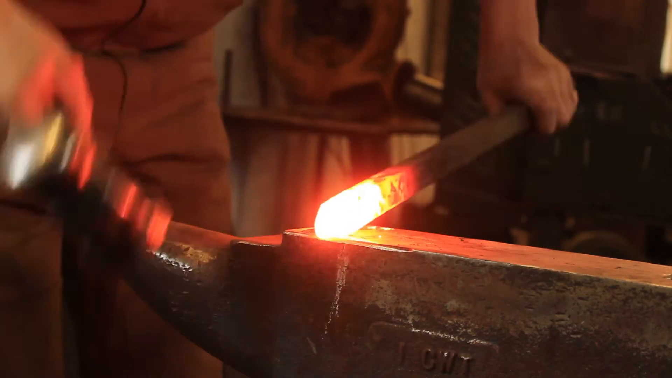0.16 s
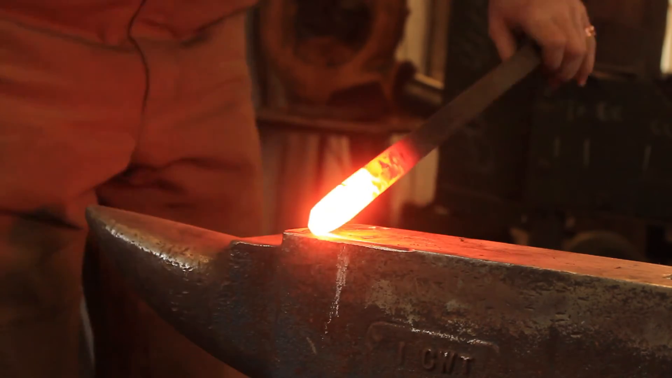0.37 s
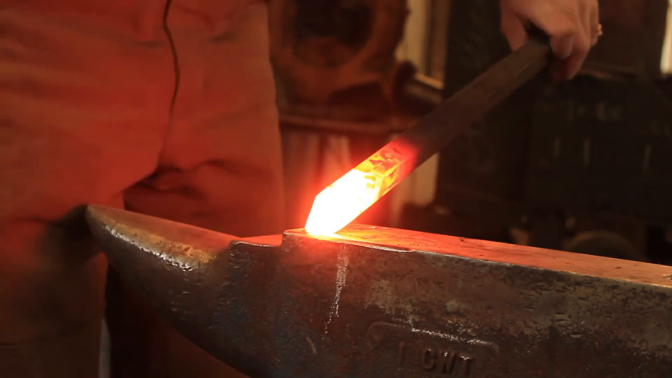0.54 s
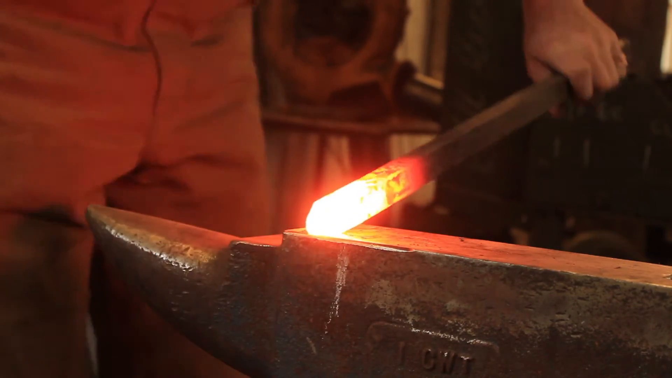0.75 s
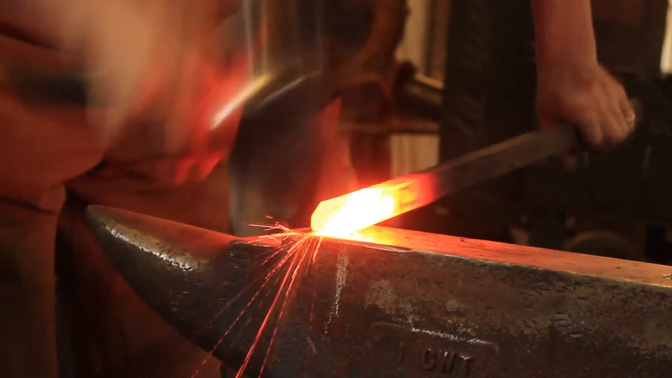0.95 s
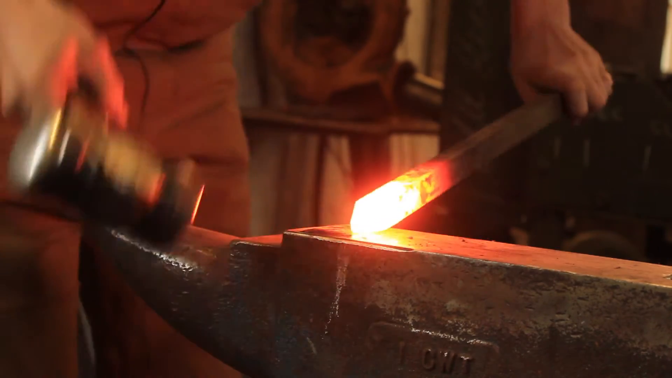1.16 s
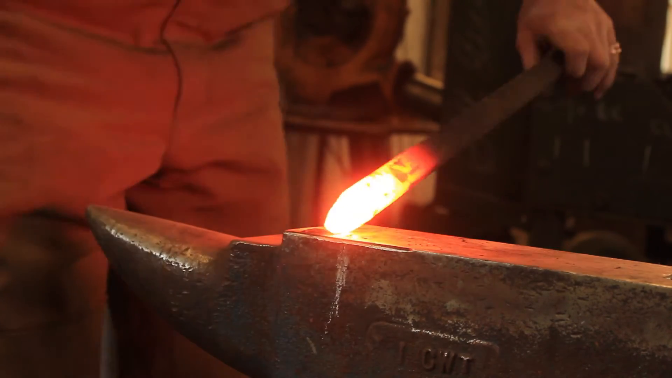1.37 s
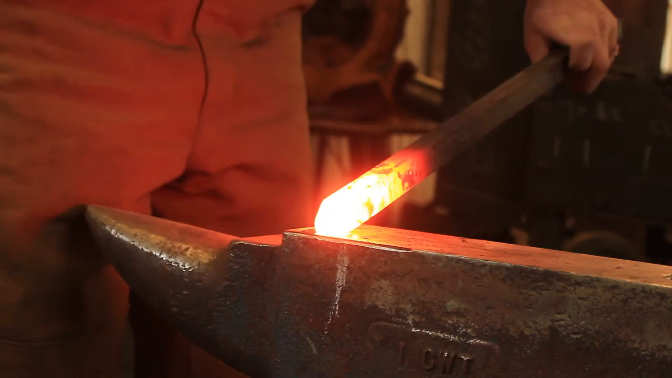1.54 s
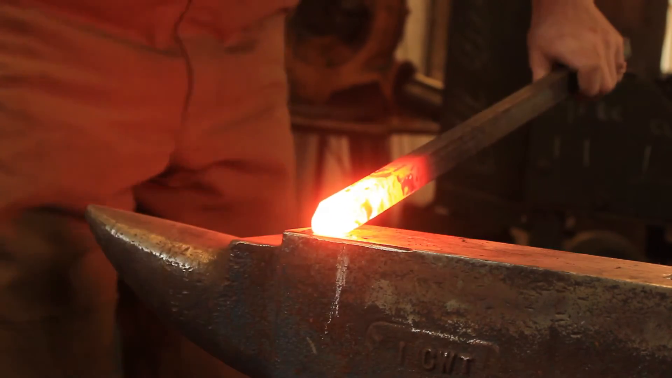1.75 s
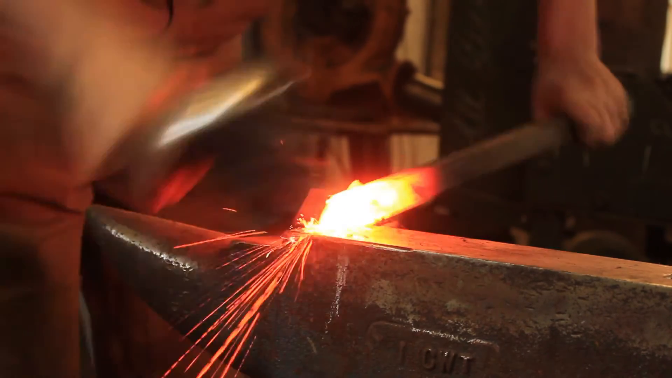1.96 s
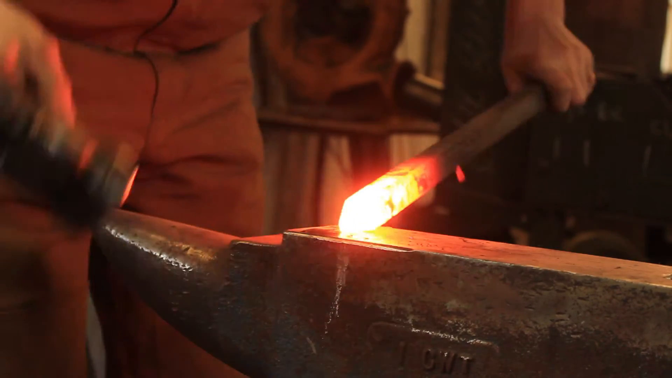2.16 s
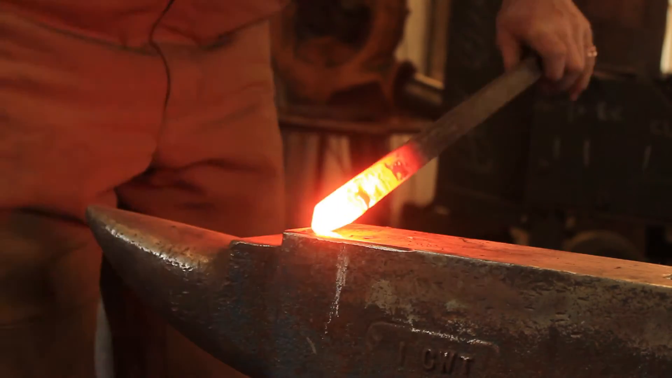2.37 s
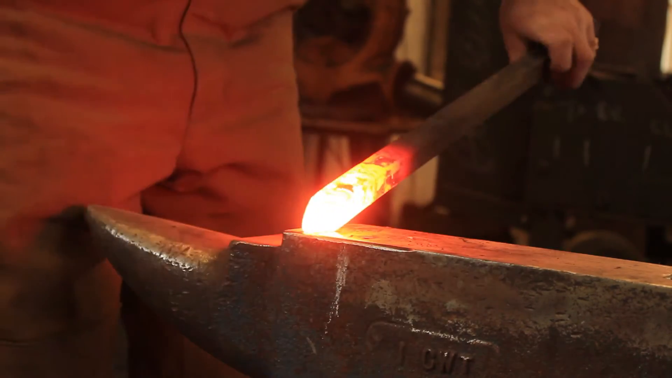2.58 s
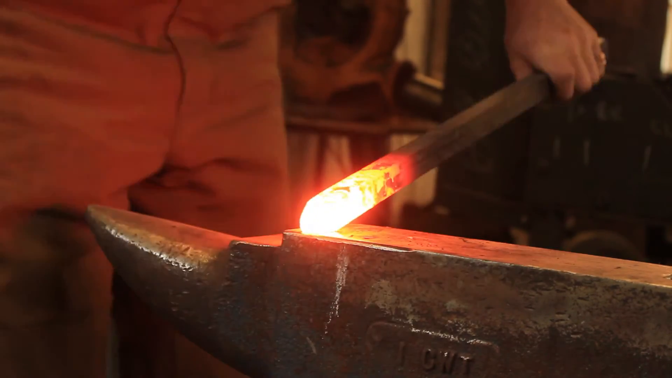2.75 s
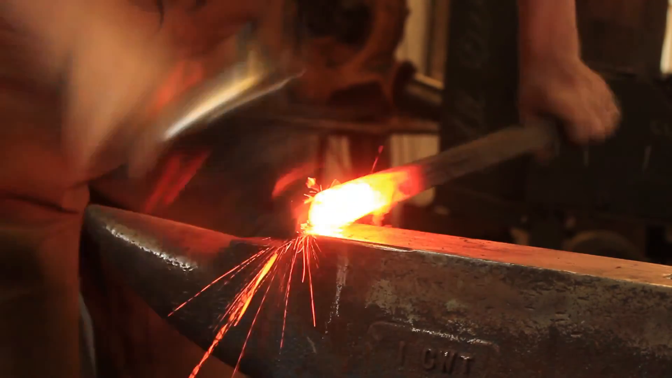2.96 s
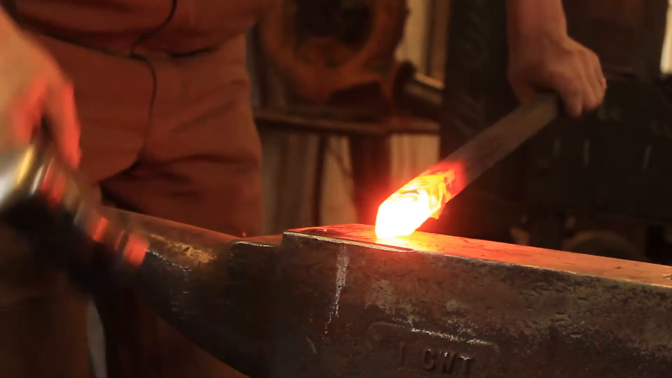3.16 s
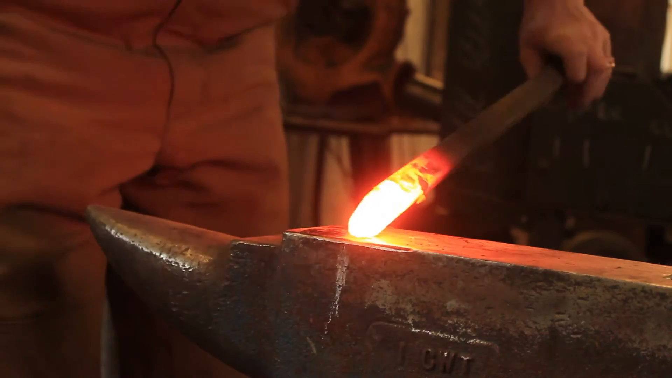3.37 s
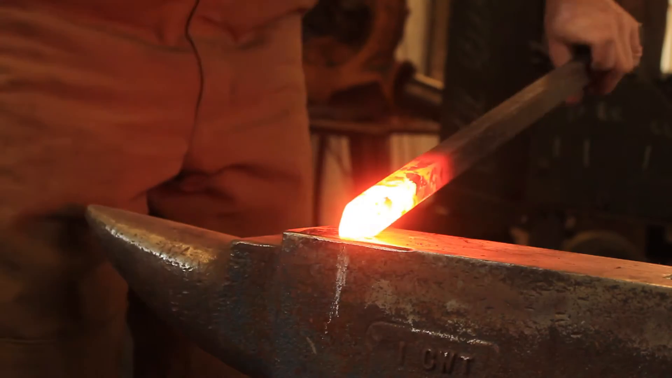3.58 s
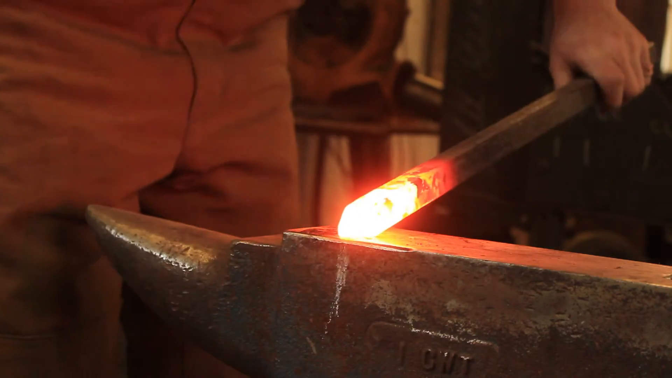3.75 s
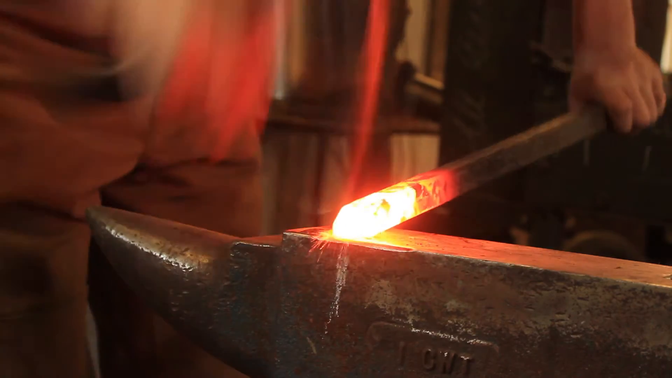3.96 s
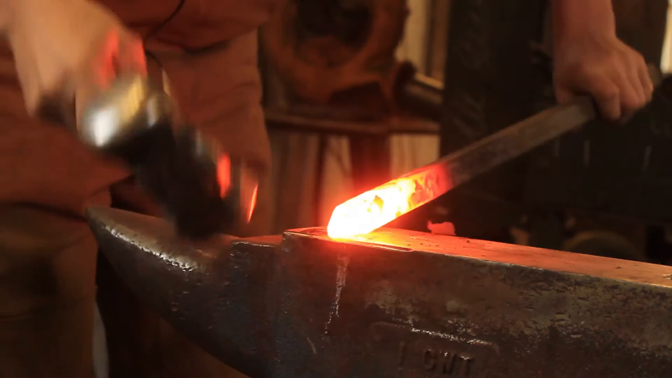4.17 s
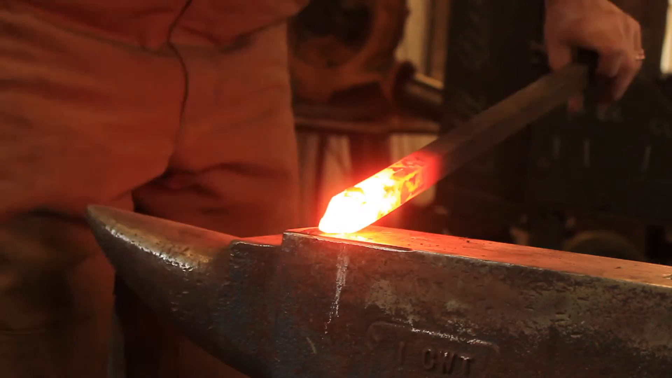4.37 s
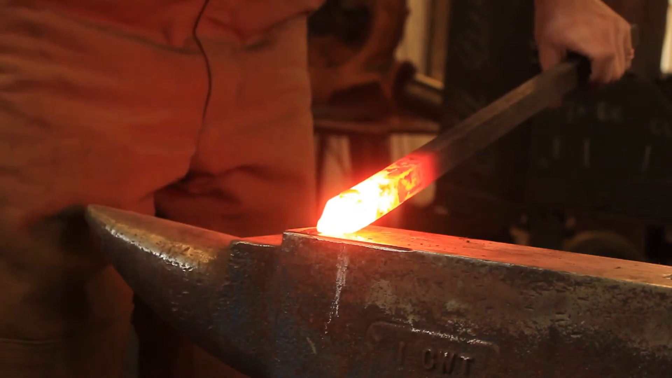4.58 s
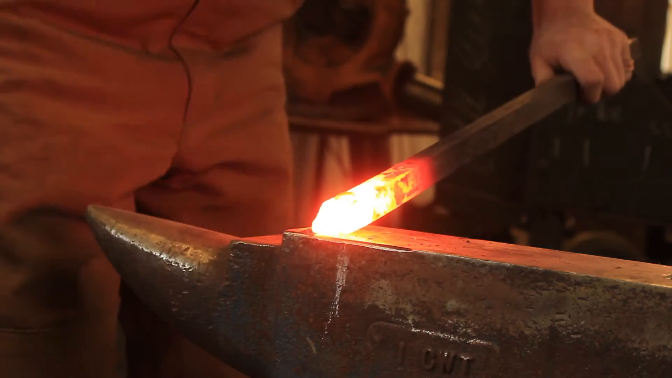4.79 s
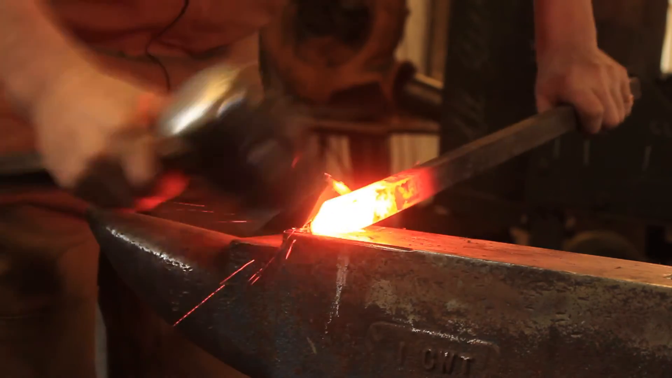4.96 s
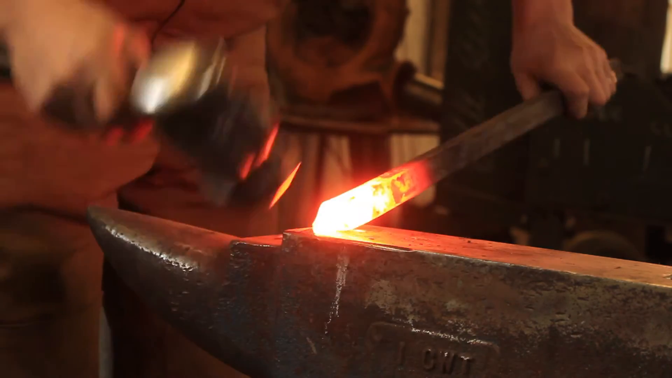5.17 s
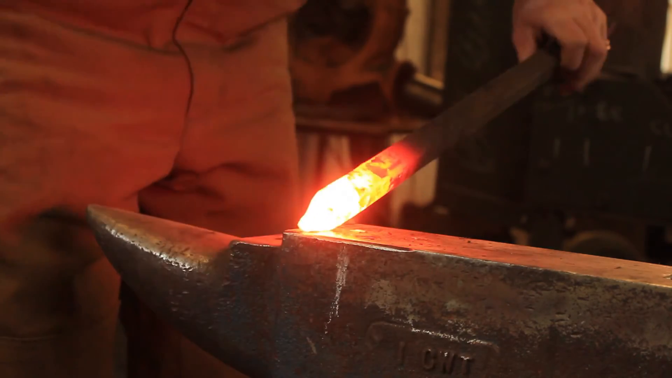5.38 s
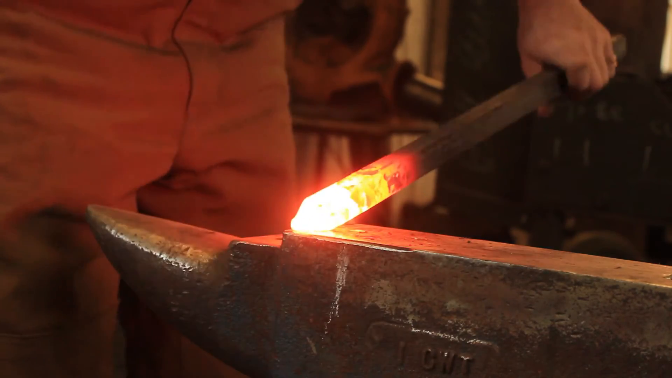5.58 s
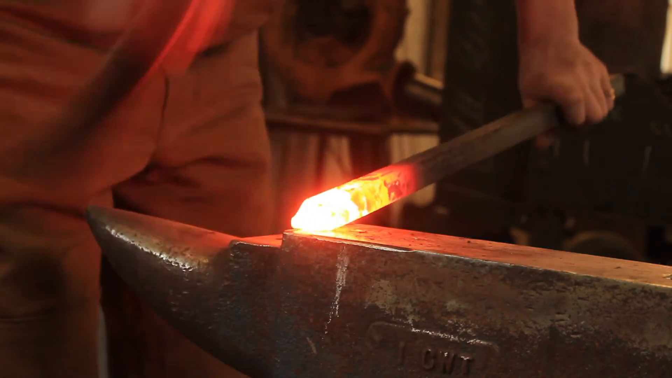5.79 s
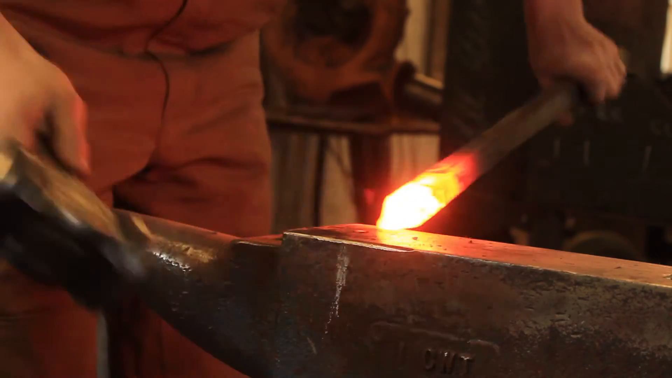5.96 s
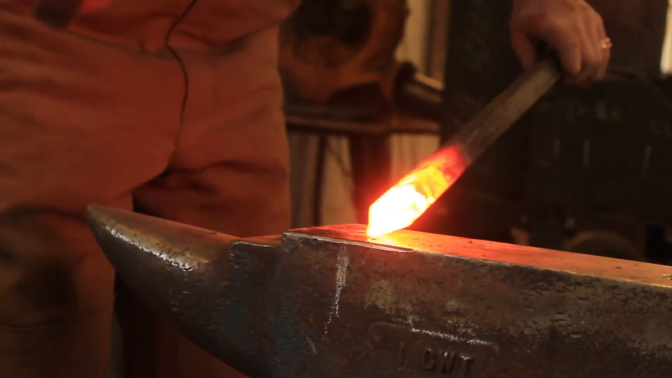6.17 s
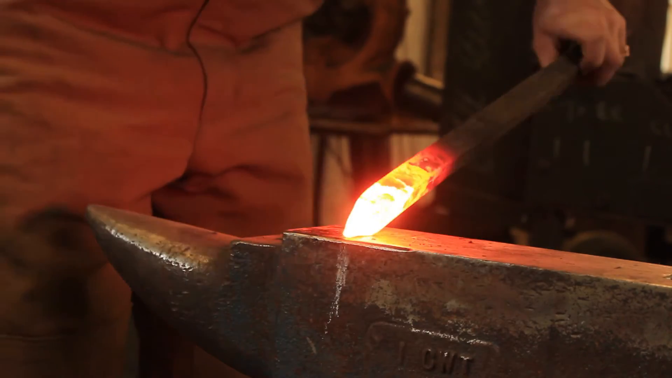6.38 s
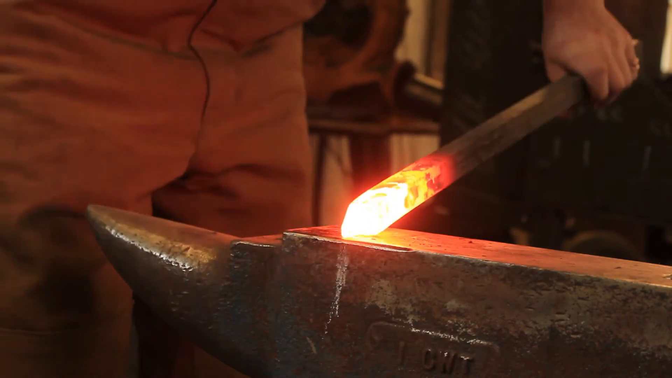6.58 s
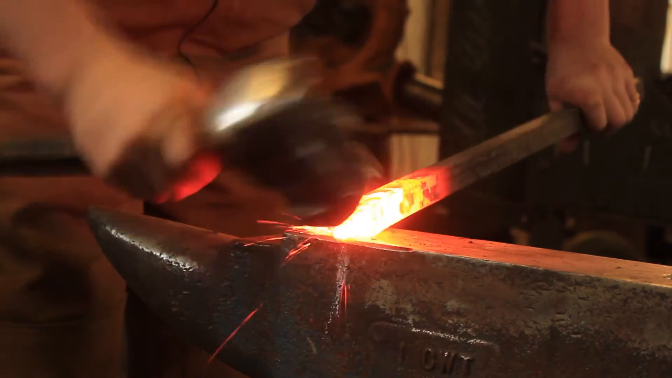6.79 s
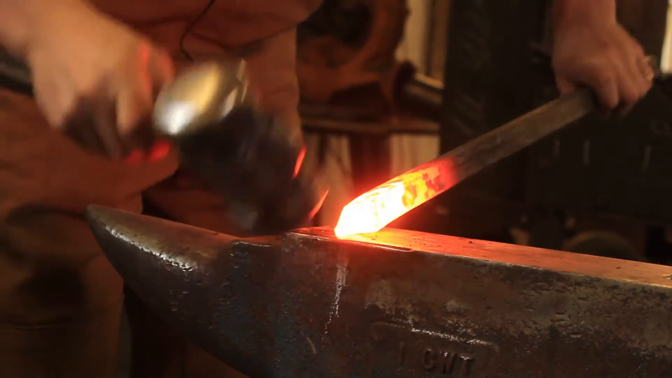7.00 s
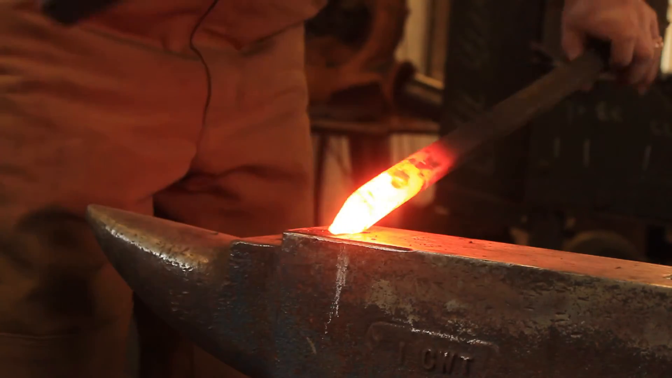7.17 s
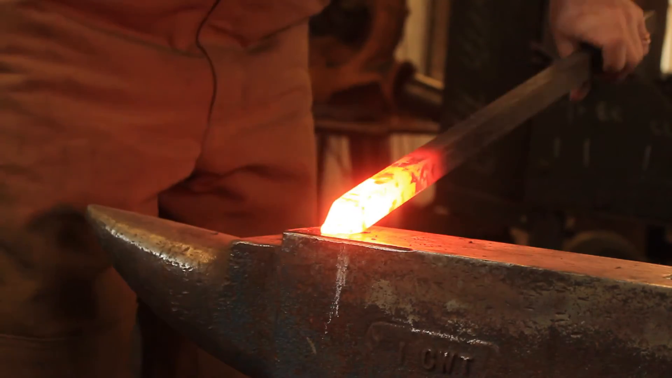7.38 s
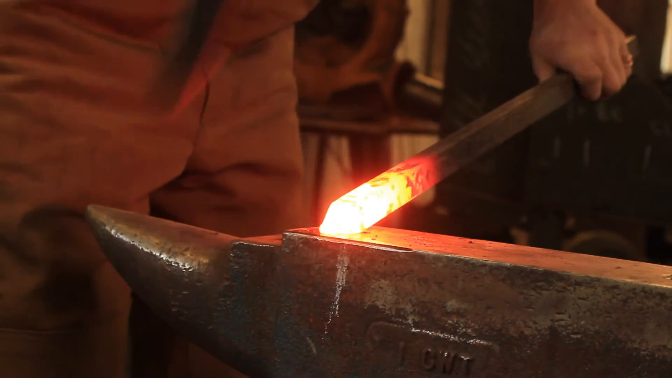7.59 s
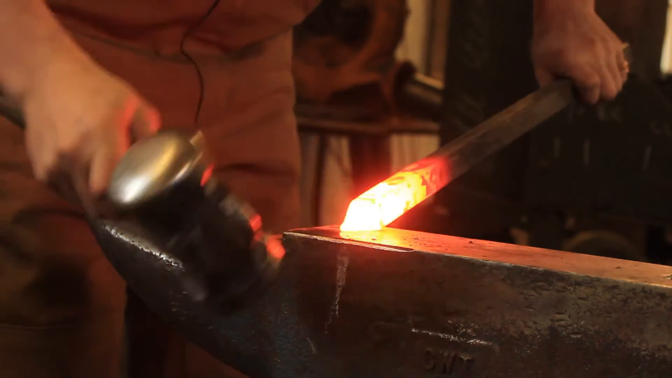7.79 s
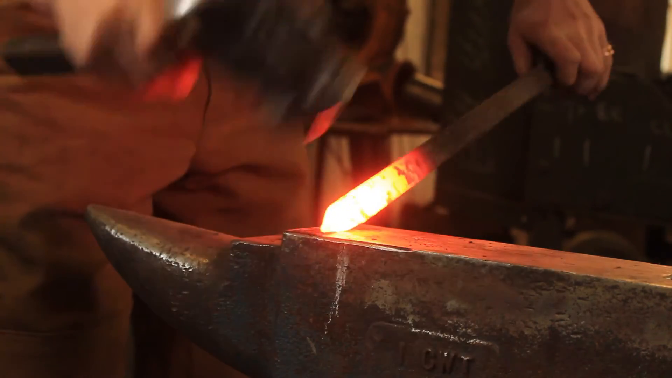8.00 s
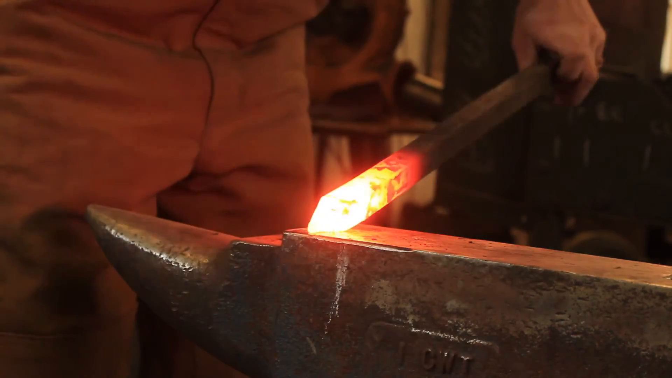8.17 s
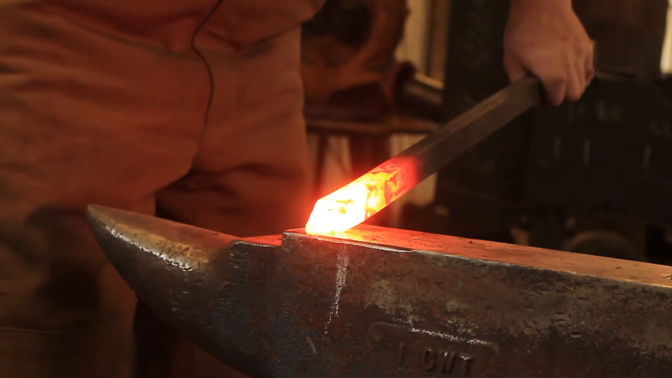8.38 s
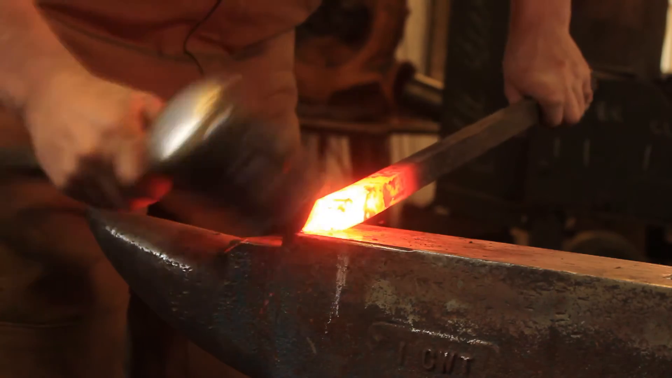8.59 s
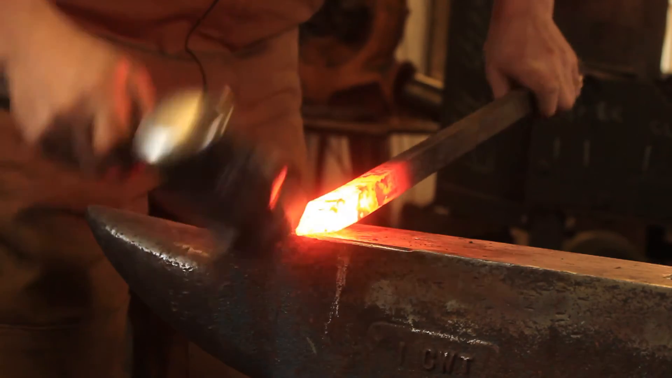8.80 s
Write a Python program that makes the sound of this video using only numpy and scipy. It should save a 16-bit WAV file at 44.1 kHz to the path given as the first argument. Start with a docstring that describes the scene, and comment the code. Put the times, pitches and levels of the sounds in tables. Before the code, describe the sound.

Ten steady hammer blows crack and ring on an anvil, softening near the end, while a forge roars and its fan whines.

```python
"""A heavy hammer draws out a glowing steel bar on an anvil, about one blow a second.
Each blow is a crack, a thud deadened by the soft hot steel, a short ring and the workshop's echo;
after most blows the bar chatters on the anvil. Behind the smith the forge fire roars and its blower
whines at one pitch. The blows overload the recorder, whose gain control turns the roar down briefly."""
import sys
import numpy as np
from scipy import signal
from scipy.fft import rfft, irfft
from scipy.io import wavfile
from scipy.ndimage import uniform_filter1d, minimum_filter1d

SR = 44100
rng = np.random.default_rng(int(sys.argv[2]) if len(sys.argv) > 2 else 0)


def wrap_up_sound(samples):
    """Save the sound to the file named by the first command line argument, as 16-bit audio."""
    columns = np.atleast_2d(samples).T
    # keep every value between -1 and 1, then stretch to whole-number steps
    tamed = np.clip(columns, -1, 1)
    steps = np.round(tamed * 32767).astype(np.int16)
    wavfile.write(sys.argv[1], SR, steps)


N = 389844


def amp(db):
    """Turns decibels into a gain to multiply by."""
    return 10 ** (np.asarray(db) / 20)


def unit(x):
    """Scales a signal to an average (rms) size of 1."""
    return x / np.sqrt(np.mean(x ** 2) + 1e-20)


def read(table, hz, column=1):
    """Looks up a table at any frequency, sliding smoothly between its rows."""
    columns = np.transpose(table)
    return np.interp(np.log(hz + 1), np.log(columns[0]), columns[column])


def noise(gain, size):
    """Noise of size 1, with its lows and highs shaped by one gain per frequency."""
    return unit(irfft(rfft(rng.standard_normal(size)) * gain, size))


def drift(rate_hz):
    """A random wobble, mostly slower than rate_hz."""
    return noise(1 / (1 + (np.fft.rfftfreq(N, 1 / SR) / rate_hz) ** 2), N)


def peak(hz, centre_hz, width_hz):
    """A hump of height 1 around one frequency."""
    return 1 / (1 + (2 * (hz - centre_hz) / width_hz) ** 2)


def ring(hz, fade_s, t, width_hz):
    """A note blurred by rattling and echoes; a fade time is the time to drop 60 dB."""
    band = noise(peak(np.fft.rfftfreq(len(t), 1 / SR), hz, width_hz), len(t))
    return band * amp(-60 * t / fade_s)


def add(mix, start_s, sound):
    """Mixes a sound in at its start time."""
    part = mix[max(round(start_s * SR), 0):][:len(sound)]
    part += sound[:len(part)]


# tone colour of the fire: f/Hz, level/dB
FIRE_COLOUR = [(25, -48.7), (40, -43), (65, -27.5), (100, -32.5), (200, -19), (330, -6), (480, 3),
               (750, -12), (1300, -11.5), (2000, -19), (3200, -18), (5500, -23), (9500, -33), (15500, -42)]
# pitches that the hearth and hood boost or swallow: f/Hz, width/Hz, level/dB
HEARTH_HOLLOWS = [(98.5, 12.3, 12), (118.6, 27, 11), (175.3, 38, 11.5), (230.3, 25.6, 9),
                  (371.7, 61.4, -10.5), (459.5, 28, -10.5), (534, 42, -13), (1340, 24, 0.5), (1721, 27, 10),
                  (2200, 350, 6.5), (2810, 23, 9), (3590, 120, 4)]
# small bumps and dips that wall echoes put in the fire's colour: f/Hz, depth/dB
WALL_RIPPLE = [(500, .3), (900, 1.7), (3000, 1.4), (7000, .4)]
def forge_fire():
    """Swirling flame makes a fluttering roar, coloured by the hollow spaces around it."""
    hz = np.fft.rfftfreq(N, 1 / SR)
    hollows_db = sum(db * peak(hz, centre, width) for centre, width, db in HEARTH_HOLLOWS)
    bumps = uniform_filter1d(rng.standard_normal(len(hz)), size=110)
    ripple_db = unit(uniform_filter1d(bumps, size=110)) * read(WALL_RIPPLE, hz)
    roar = noise(amp(read(FIRE_COLOUR, hz) + hollows_db + ripple_db), N)
    return roar * amp(-17.5 + 0.28 * drift(rate_hz=22))


def blower(pitch_hz=634.0, level_db=-20.5):
    """The fan blades whine on one note, shaken a little by the air swirling around them."""
    cycles = np.cumsum(pitch_hz + .12 * drift(rate_hz=1.5)) / SR
    whine = np.sin(2 * np.pi * cycles + .08 * drift(rate_hz=6))
    whine *= 1 + .12 * drift(rate_hz=6)
    return amp(level_db) * unit(whine)


# tone colour of the crack as the hammer lands: f/Hz, level/dB
CRACK_COLOUR = [(40, -39), (200, -5.5), (500, 0), (1200, 9), (2400, 1), (4500, -2), (7000, -8.5),
                (10000, -18.5), (16000, -65)]
def crust_crack(t):
    """The flaky crust on the hot steel (its scale) snaps at first touch, then is crushed."""
    snap = 1.18 * np.exp(-t / 0.0011)
    crush = np.exp(-t / 0.018)
    hz = np.fft.rfftfreq(len(t), 1 / SR)
    return noise(amp(read(CRACK_COLOUR, hz)), len(t)) * (snap + crush)


# dull notes of hammer, bar and anvil together: f/Hz, level/dB, fade/s
THUD_NOTES = [(70, -27.5, 0.055), (280, -3.5, 0.016), (517, -1, 0.037), (701, 1, 0.024), (1156, 1.5, 0.021),
              (1630, -9, 0.012), (1887, -3, 0.015), (2325, -13, 0.13), (2890, -17.5, 0.11)]
def thud(t):
    """Soft hot steel deadens the blow, so these notes die almost at once."""
    notes = np.zeros(len(t))
    for k, (hz, db, fade_s) in enumerate(THUD_NOTES):
        tone = np.sin(2 * np.pi * hz * rng.normal(1, 0.012) * t)
        notes += (-1) ** k * amp(db - 60 * t / fade_s) * tone  # every other note starts downwards
    return notes * (1 - np.exp(-t / 0.0003))  # the steel gives way before the hammer stops


# bright notes of the anvil and hammer head: f/Hz, level/dB, fade/s
ANVIL_NOTES = [(2780, -2, 0.22), (2950, -15, 0.48), (3210, -7, 0.27), (4063, 0, 0.15), (4530, -9, 0.48),
               (4860, -10, 0.45), (5750, -16.5, 0.45), (6350, -17, 0.43), (7340, -16, 0.3),
               (8730, -22, 0.31), (9200, -26, 0.34), (11900, -31, .22), (13950, -35, .22)]
def anvil_ring(t):
    """Each blow lands on another spot, so each note rings a bit louder or softer."""
    return sum(amp(db + 2 * rng.standard_normal()) * ring(hz, fade_s, t, width_hz=190)
               for hz, db, fade_s in ANVIL_NOTES)


# the workshop's echo of a blow: f/Hz, level/dB, fade/s
ECHO_BANDS = [(40, -34, 0.33), (150, -13, 0.43), (324, -4.5, 0.18), (480, 9, 0.25), (810, -3, 0.51),
              (1120, 0, 0.42), (1700, -4.5, 0.4), (3300, -9, 0.58), (4550, -12.5, 0.42), (7100, -24, 0.47),
              (10000, -35, 0.4), (16000, -36, .2)]
def workshop_echo(t):
    """Many echoes blend into a wash of noise; each band of it fades at its own speed."""
    wash = noise(amp(read(ECHO_BANDS, np.fft.rfftfreq(len(t), 1 / SR))), len(t))
    hz, times, bands = signal.stft(wash, SR, nperseg=256)
    fade_s = read(ECHO_BANDS, hz, column=2)[:, None]
    tail = signal.istft(bands * amp(-60 * times / fade_s), SR, nperseg=256)[1]
    return tail[:len(t)] * (1 - np.exp(-t / 0.011))  # the echoes build up quickly


# the smith's blows: t/s, level/dB, crack boost/dB, ring boost/dB
HAMMER_BLOWS = [(.0051, 2, -1.5, -9), (1.0321, 3.5, 2, -2), (2.0227, 0.5, -2, 3), (3.0254, -0.5, -3, 2.5),
                (4.0439, 0.5, -1.5, 1.5), (5.0008, -0.5, -1, -2), (5.9025, 1, -1, -2.5),
                (6.8470, -1.5, -5, -2), (7.7550, -3.5, -1.5, 1), (8.626, -5.5, -3, -7)]
def hammer(mix):
    """Adds the blows: each sets off a crack, a thud, a ring and the room's echo."""
    t = np.arange(SR) / SR
    for start_s, level_db, crack_db, ring_db in HAMMER_BLOWS:
        blow = amp(5.0 + crack_db) * crust_crack(t)
        blow += amp(8.5) * thud(t)
        blow += amp(-7.0 + ring_db) * anvil_ring(t)
        blow += amp(2.0) * workshop_echo(t)
        add(mix, start_s, amp(level_db) * blow)


# the bar's bounces on the anvil: t/s, level/dB, f/Hz, fade/s
BAR_BOUNCES = [(0.047, -24, 3350, 0.19), (2.035, -23, 6400, 0.4), (2.057, -13.5, 3140, 0.37),
               (2.112, -18, 3100, .27), (3.036, -17, 3410, 0.29), (5.012, -11, 3300, 0.15),
               (5.055, -21, 2998, 0.3), (5.923, -19, 4800, .35), (6.856, -13, 3520, 0.15),
               (7.775, -34, 6360, 0.27), (7.789, -27, 3180, 0.2), (8.683, -29, 4690, 0.3),
               (8.696, -27, 3400, 0.36)]
# notes of the bar: multiple of the bounce's f, level/dB
BAR_NOTES = [(1, 10), (.955, -9), (1.42, -7), (2.04, -20), (2.3, -13), (2.75, -26)]
def bar_chatter(mix):
    """Adds the chatter: the bar drops back on the anvil and its cold end rings briefly."""
    t = np.arange(SR // 2) / SR
    onset = 1 - np.exp(-t / 0.00077)
    for start_s, level_db, pitch_hz, fade_s in BAR_BOUNCES:
        clink = sum(amp(db) * ring(pitch_hz * ratio, fade_s, t, width_hz=230) for ratio, db in BAR_NOTES)
        add(mix, start_s, amp(level_db) * clink * onset)


def scene():
    """Hammering over the sound of the forge, the same on the left and the right."""
    mix = forge_fire() + blower()
    hammer(mix)
    bar_chatter(mix)
    return np.array([mix, mix])


def smooth(x, seconds):
    """Follows a signal slowly, evening out quick changes."""
    memory = np.exp(-1 / (seconds * SR))
    return signal.lfilter([1 - memory], [1, -memory], x)


def gain_control(x, threshold_db, hold_s, recovery_db_per_s, attack_s):
    """Turns the volume down when it is too loud, waits, then creeps back up."""
    power = smooth((x ** 2).mean(0), seconds=0.003)
    excess_db = np.maximum(10 * np.log10(power + 1e-12) - threshold_db, 0)
    half_hold = int(hold_s * SR / 2)
    held_db = -minimum_filter1d(-excess_db, 2 * half_hold + 1, origin=half_hold, mode="constant")
    recovery_db = np.arange(N) * recovery_db_per_s / SR
    cut_db = np.maximum.accumulate(held_db + recovery_db) - recovery_db
    return x * amp(-smooth(cut_db, attack_s))


def record(dry):
    """The gain control is too slow for the blows, so their peaks are cut flat; the top treble is lost."""
    ducked = gain_control(dry, threshold_db=-7.5, hold_s=0.11, recovery_db_per_s=36, attack_s=0.0086)
    clipped = np.clip(ducked, -1, 1)
    treble_cut = signal.firwin(511, cutoff=15900, window=("kaiser", 8), fs=SR)
    return signal.oaconvolve(clipped, treble_cut[None], "same")


dry = scene()
out = record(dry)
wrap_up_sound(out)
```